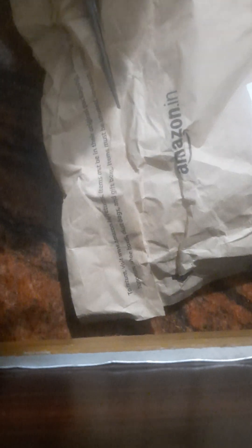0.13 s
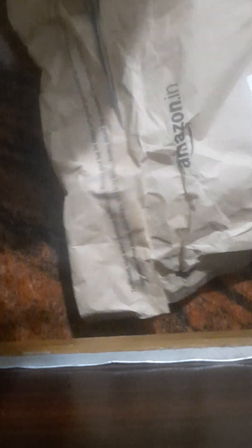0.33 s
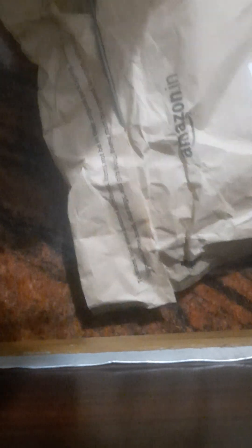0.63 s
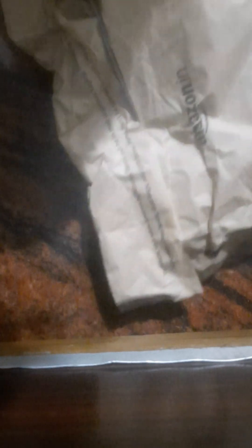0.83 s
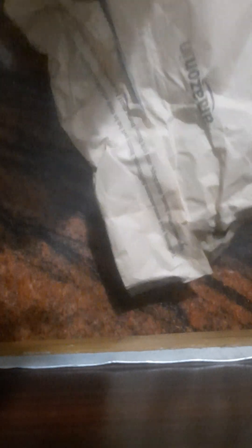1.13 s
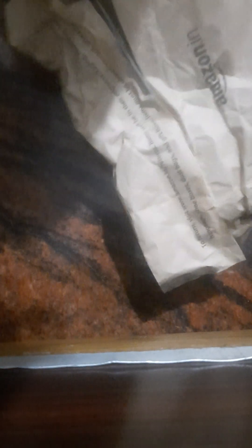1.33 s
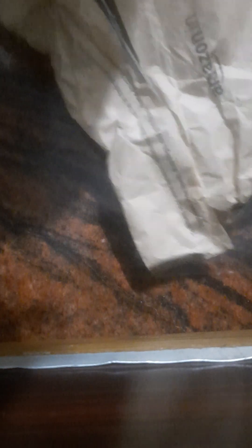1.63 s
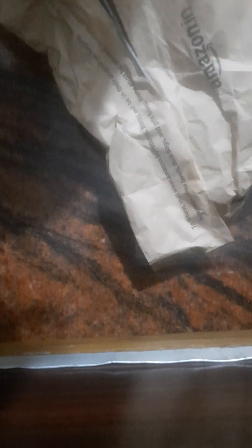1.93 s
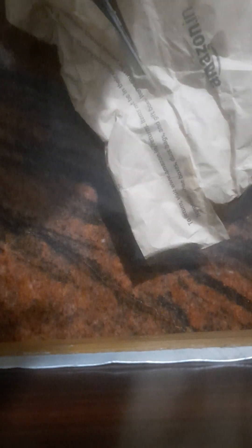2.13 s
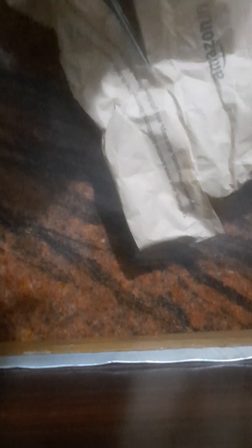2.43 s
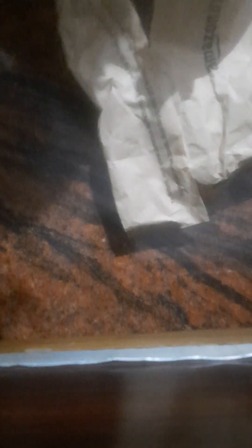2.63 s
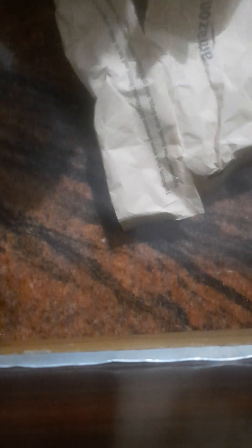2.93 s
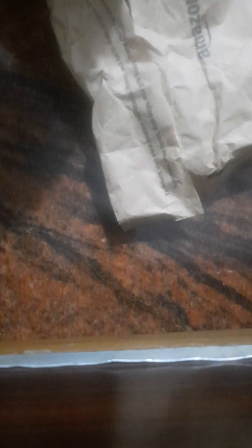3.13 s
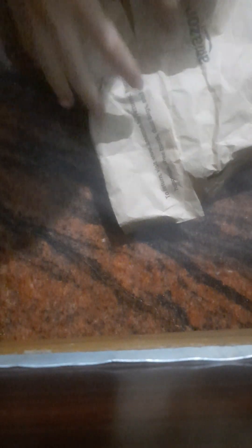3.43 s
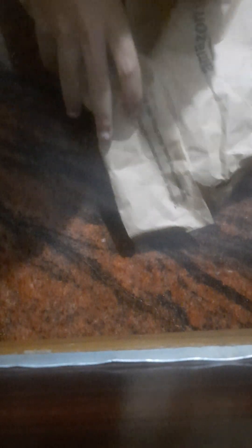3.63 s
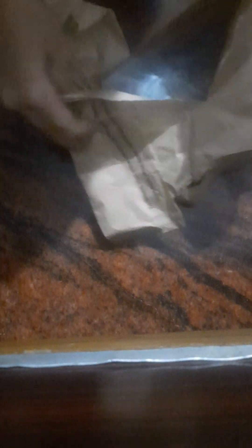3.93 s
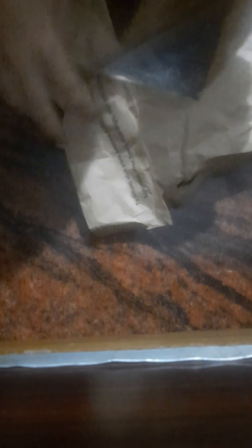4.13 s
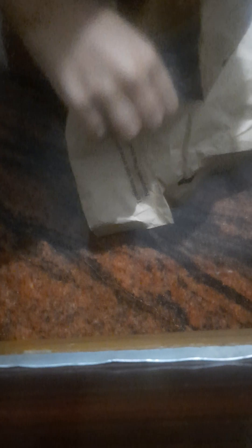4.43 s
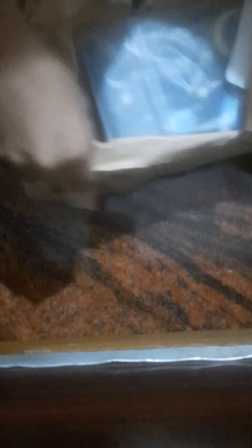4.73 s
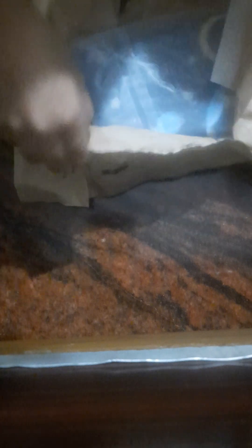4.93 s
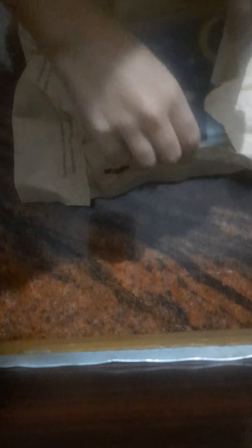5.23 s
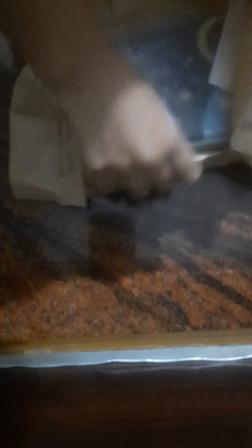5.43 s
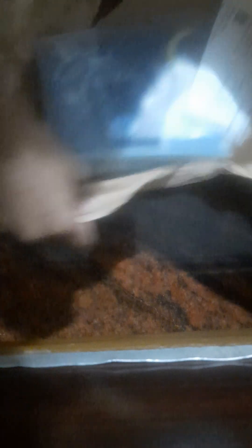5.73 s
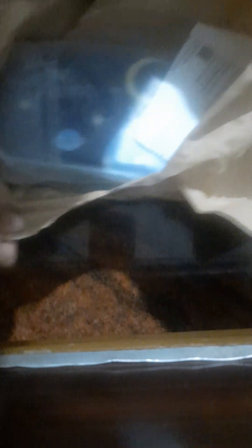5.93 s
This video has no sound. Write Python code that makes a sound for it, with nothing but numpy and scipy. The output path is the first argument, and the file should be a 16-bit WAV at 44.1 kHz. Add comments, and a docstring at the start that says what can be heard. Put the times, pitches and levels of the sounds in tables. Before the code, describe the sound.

Close up in a small, slightly echoing room, stiff paper crunches and crackles as scissors cut along a mailer bag. After a brief lull with a few fine ticks, hands tug the bag apart: irregular rustles, hissing rips and sharp crease snaps, with a soft hollow boom as it flexes open. A very faint hum lies underneath.

```python
"""Scissors crunch through a paper mailer bag on a stone counter; then hands pull the bag apart.
Each stroke takes up slack, grabs, holds and lets go: creases buckle and crinkle, fibres break and
hiss, and the hollow bag flexes and thuds. Single creases snap, and the last fibres part with thin ticks.
A small hard room echoes it all to a nearby phone, over a low hum and two faint far tones."""
import sys
import numpy as np
from scipy import signal
from scipy.fft import rfft, irfft
from scipy.io import wavfile
from scipy.ndimage import uniform_filter1d

SR = 44100
rng = np.random.default_rng(int(sys.argv[2]) if len(sys.argv) > 2 else 0)


def materialize(psi):
    """Save the field psi as 16-bit PCM at rate SR to the path in sys.argv[1].

    A 1-D psi becomes a single channel; in a 2-D psi each row is a channel.
    """
    bounded = np.clip(np.atleast_2d(psi).T, -1, 1)
    quanta = np.round(bounded * 32767).astype(np.int16)
    wavfile.write(sys.argv[1], SR, quanta)


N = 268128
TIME = np.arange(N) / SR

# strokes of scissors and hands: start t/s, hold t/s, level/dB, swell over the hold/dB,
# then, against the stroke: breaking fibres level/dB, flexing bag level/dB
PAPER_STROKES = [(-0.03, 0.096, -30.5, -4, -10, -5), (.162, 0.11, -28, 6, -7, -15.5),
                 (0.301, 0.074, -34, 8, -4.5, -13), (0.376, 0.064, -24.5, -2.5, -7.5, -7.5),
                 (0.5, 0.053, -43.5, 6, -11, -4), (.57, 0.091, -27.5, 0.5, -5.5, -12),
                 (0.722, .045, -41.5, -0.5, -8, -2.5), (0.779, 0.074, -30, -4, -7, -8.5),
                 (.835, 0.06, -23.5, 1, -5.5, -13.5), (1.026, 0.11, -28.5, 5, -5.5, -11),
                 (1.237, .09, -35, 5.5, -4.5, -10.5), (1.338, .11, -25.5, 0, -4, -13),
                 (1.573, 0.028, -45.5, 0, -4.5, 4), (1.606, 0.18, -34.5, -9.5, -8.5, -6.5),
                 (1.803, 0.085, -49.5, 0, -14, -2), (1.967, 0.16, -31.5, -4.5, -8.5, -7),
                 (2.155, 0.097, -37.5, -0.5, -6, -9), (2.339, .04, -46.5, 3, -8, 9.5),
                 (2.385, 0.23, -28.5, 1, -10, -5.5), (2.626, 0.058, -37, -2, 2, -14),
                 (2.854, 0.16, -52.5, -6.5, -4.5, -6.5), (2.976, 0.2, -44, -1.5, -2.5, -11.5),
                 (3.36, 0.019, -44.5, 9.5, -3, -5), (3.39, 0.042, -29.5, 7, -5.5, -16.5),
                 (3.48, 0.14, -32.5, -1, -9.5, -13), (3.62, 0.23, -20.5, 0.5, -1.5, -13.5),
                 (3.801, 0.022, -28, 0, -11, 0), (4.016, 0.081, -48, -2.5, -4, -21),
                 (4.104, 0.044, -43.5, 4, -4.5, -7), (4.428, .045, -48, 3.5, 2, -15),
                 (4.477, 0.074, -28, 2, 2, -8), (4.562, 0.18, -23, -1.5, -1, -6.5),
                 (4.846, 0.042, -33.5, -1, -7, -9.5), (4.918, 0.066, -45, 2.5, -3, -15),
                 (5.106, 0.2, -51.5, -2.5, -1.5, -2.5), (5.142, 0.023, -44, -1.5, -25, -6),
                 (5.337, 0.14, -35.5, 1, -9.5, -6), (5.49, 0.043, -20, 1.5, -0.5, -9),
                 (5.53, 0.069, -30, 4, -0.5, -1), (5.636, .05, -34, -4, -3.5, -13),
                 (5.676, 0.072, -17.5, -3, -1.5, -5), (5.886, 0.14, -40, -4.5, -7, -5.5)]
# single creases snapping: t/s, relative crease level/dB, relative fibre crack level/dB, facet f/Hz
CREASE_SNAPS = [(0.064, -15.5, -36, 1200), (0.164, -32, -38, 2200), (0.219, -25, -34, 1530),
                (0.282, -13.5, -25.5, 1510), (0.327, -22.5, -31, 980), (0.393, -14, -26, 970),
                (0.419, -17, -31, 1200), (0.444, -17, -28, 1400), (0.612, -13, -39, 860),
                (0.771, -10, -20, 2970), (0.817, -15.5, -22.5, 1580), (1.156, -20, -31, 1590),
                (1.231, -18.5, -35.5, 930), (1.277, -22, -46, 1400), (1.324, -13, -32, 1300),
                (1.37, -10.5, -23.5, 1400), (1.393, -18, -28, 1810), (1.42, -20.5, -23, 1420),
                (1.608, -21, -35.5, 2070), (1.836, -34, -35.5, 2980), (1.962, -21.5, -37, 1350),
                (2.023, -26, -31, 1630), (2.121, -23.5, -28.5, 1500), (2.14, -21, -28, 1700),
                (2.221, -17.5, -43, 2000), (2.392, -15.5, -26, 2600), (2.424, -18, -40, 940),
                (2.442, -16.5, -23, 2020), (2.458, -22, -25, 2800), (2.472, -10.5, -31, 2600),
                (2.505, -17, -22, 2010), (2.523, -22, -18, 1800), (2.56, -16, -28.5, 1570),
                (2.607, -17, -18.5, 1690), (3.136, -27.5, -50, 2810), (3.391, -25.5, -31, 1990),
                (3.404, -20, -21.5, 1300), (3.436, -21.5, -22.5, 2300), (3.491, -23.5, -35.5, 2300),
                (3.535, -20, -33.5, 1790), (3.576, -13, -18.5, 2740), (3.621, -13, -24, 2510),
                (3.641, -14, -38, 2600), (3.661, -13, -19, 2600), (4.102, -31, -54, 1600),
                (4.149, -28.5, -34, 1690), (4.443, -29.5, -49, 2000), (4.473, -15, -32, 2170),
                (4.983, -20.5, -37, 2820), (5.165, -31.5, -59, 1680), (5.448, -22.5, -25.5, 2000),
                (5.786, -19, -20.5, 2180), (5.92, -25, -48, 2130), (5.996, -19, -28.5, 2300),
                (6.047, -24.5, -39.5, 2780)]
# thin ticks as the last fibres part: t/s, relative level/dB
FIBRE_TICKS = [(1.036, -20.5), (2.866, -50), (2.972, -23.5), (2.988, -14.5), (3.009, -24), (3.024, -21.5),
               (3.078, -16.5), (3.109, -22.5), (3.416, -20)]
# how far the mouth of the bag is open: t/s, share from 0 to 1
BAG_OPENING = [(2.7, 0.2), (3.6, 0.79)]
# A "colour" says how strong each frequency is compared with the others.
# colours of buckling creases, breaking fibres and ticks: f/Hz, level/dB
CREASE_COLOUR = [(100, -16), (300, -13), (450, 1.5), (1000, -3), (2000, -2.5), (3500, -3.5), (5000, -9),
                 (9000, -56)]
FIBRE_COLOUR = [(500, -37), (2000, -12), (4200, 0), (7000, 0.5), (8800, -3.5), (12000, -2.5), (16000, -2)]
TICK_COLOUR = [(800, -29), (2500, -11), (4000, -4), (9000, -2), (12000, 0), (16000, 8)]
# colours of the closed bag on the counter and of the air in the open bag: f/Hz, level/dB
THUD_COLOUR = [(25, -53), (45, -8.5), (75, -9.5), (120, 5), (160, -3), (250, -5.5), (380, -2), (800, -35.5)]
HOLLOW_COLOUR = [(30, -38.5), (100, -15.5), (170, -5), (215, -6.5), (290, 0.5), (360, -9.5), (800, -43)]
# resonances of the bag and the space around it, and the stiff paper's brief ring: f/Hz, width/Hz, lift/dB
BAG_RESONANCES = [(56, 30, 12), (101, 17, 5.5), (212, 75, 7.5), (250.7, 42, 6.5), (410.7, 43.6, 12.5),
                  (585, 33, 9.5), (744, 45, 5.5), (1092, 107, 11), (1453, 43, 10.5), (7090, 530, 5)]
PAPER_RING = [(2290, 110, 7.5)]
# colour of the room's quiet air: f/Hz, level/dB
AIR_COLOUR = [(18, -36), (30, -13), (211, -14.5), (355, -12.5), (978, -19), (1730, -17), (3980, -52),
              (6700, -29.5), (15000, -52.5)]
# steady hum: f/Hz, level/dB
HUM_TONES = [(98, -74.5), (209.9, -64.5)]
# faint far tones: start t/s, length t/s, start f/Hz, end f/Hz, peak level/dB
DISTANT_TONES = [(1.68, .3, 470, 460, -56), (2.7, .3, 399, 388, -56)]
# colour of the right microphone, which faces away from the paper: f/Hz, level/dB against the left
FAR_MIC_COLOUR = [(60, -3.5), (170, -3.5), (290, 8), (380, -23.5), (520, -5.5), (740, 3.5), (1020, -5.5),
                  (1300, 0.5), (2300, 1.5), (3200, -1.5), (6800, -7), (8500, -11.5), (14000, -16)]

GRAB_S, BAG_GRAB_S = 0.0059, 0.026
# after a stroke the fibres stop first and the whole bag settles last
CREASE_RELEASE_DB_PER_S, FIBRE_RELEASE_DB_PER_S, BAG_RELEASE_DB_PER_S = 262.5, 304, 165.5
# taking up slack before each grab: length, and levels against the stroke
SLACK_S, CREASE_SLACK_DB, FIBRE_SLACK_DB, BAG_SLACK_DB = 0.065, -17, -20, -10
CUTTING_ENDS_S, HAND_SLACK_DB = 2.75, -5  # after the cutting, hands grab with less warning
# slip rates in a usual stroke; EFFORT_POWER sets how they grow with its strength
USUAL_DB, BUCKLES_PER_S, BREAKS_PER_S, EFFORT_POWER = -29.5, 1600, 3300, .45
# snaps come from the bag's near edge: gain into the room, and straight to each microphone
SNAP_ROOM_DB, SNAP_NEAR_DB, SNAP_FAR_DB = -1.5, -9.5, -22.5
FAR_MIC_LAG_S, TOP_HZ = 0.00048, 15900


def undb(db):
    """Turn decibels into a number to multiply by."""
    return 10 ** (np.asarray(db) / 20)


def unit(h):
    """Scale a signal so that its energy is 1."""
    return h / np.sqrt(np.sum(h ** 2))


def through(x, h):
    """Pass a sound through a filter, given as its response h to one click."""
    return signal.oaconvolve(x, h)[:len(x)]


def response(colour, peaks=(), size=4096):
    """How a filter with this colour and these resonant peaks answers one click."""
    f = np.maximum(np.fft.rfftfreq(size, 1 / SR), 1)
    hz, db = np.transpose(colour)
    db = np.interp(np.log(f), np.log(hz), db)
    for centre, width, lift in peaks:
        db = db + lift / (1 + (2 * (f - centre) / width) ** 2)
    cepstrum = irfft(np.log(undb(db)))
    cepstrum[1:size // 2] *= 2  # folding this in half puts all the ringing after the click
    cepstrum[size // 2 + 1:] = 0
    return irfft(np.exp(rfft(cepstrum)))


def steady(x, span_s):
    """Even out the loudness over a short span, keeping the grain."""
    power = uniform_filter1d(x ** 2, int(span_s * SR))
    power = uniform_filter1d(power, int(span_s * SR / 2))
    return x / np.sqrt(np.maximum(power, 0) + 1e-12)


def pressure(grab_s, release_db_per_s, slack_db, fibre=False, flex=False):
    """Strength of the strokes: each takes up slack, grabs, swells or eases while held, then lets go."""
    power = np.full(N, 1e-12)
    for start, hold, level_db, swell_db, fibre_db, flex_db in PAPER_STROKES:
        span = slice(int(max(start - SLACK_S, 0) * SR), int((start + 1) * SR))
        t = TIME[span] - start
        db = level_db + fibre * fibre_db + flex * flex_db
        db = db + swell_db * (np.clip(t / hold, 0, 1) - .5)
        db = db - release_db_per_s * np.maximum(t - hold, 0)
        slack_gain = undb(slack_db + HAND_SLACK_DB * (start > CUTTING_ENDS_S))
        slack = slack_gain * np.sqrt(np.clip(1 + t / SLACK_S, 0, 1))
        grab = np.clip(t / grab_s, 0, 1)
        power[span] += (np.maximum(slack, grab) * undb(db)) ** 2
    return np.sqrt(power)


def slips(per_s, spread_db):
    """The paper gives in tiny random jumps, either way: many small, a few large."""
    happens = rng.random(N) < per_s / SR
    size = undb(spread_db * np.minimum(rng.exponential(size=N), 5))
    return happens * size * rng.choice([-1, 1], N)


def facet(x, hz, q):
    """A facet, a patch of paper between creases, rings very briefly; a higher q rings longer."""
    hz = min(hz, SR / 3)
    return signal.lfilter(*signal.iirpeak(hz, max(q, 4 * hz / SR), fs=SR), x)


def swarm(pulses, low_hz, high_hz, q, count=9):
    """Every slip rings one of several facets, picked at random."""
    which = rng.integers(0, count, N)
    pitches = np.geomspace(low_hz, high_hz, count)
    return sum(facet(pulses * (which == k) + 1e-18, hz, q) for k, hz in enumerate(pitches))


def catching(depth_db, limit=1.5, size=180):
    """Paper catches and gives every few milliseconds, so slips come in bunches of limited strength."""
    strengths = np.minimum(rng.standard_normal(N // size + 1), limit)
    held = np.repeat(strengths, size)[:N]
    return steady(undb(depth_db * uniform_filter1d(held, size // 2)), span_s=0.11)


def strokes(crinkling):
    """Creases buckle, fibres break and the whole bag flexes; harder strokes slip more often."""
    breaking = pressure(GRAB_S, FIBRE_RELEASE_DB_PER_S, FIBRE_SLACK_DB, fibre=True)
    flexing = pressure(BAG_GRAB_S, BAG_RELEASE_DB_PER_S, BAG_SLACK_DB, flex=True)
    effort = (crinkling / undb(USUAL_DB)) ** EFFORT_POWER
    buckles = slips(BUCKLES_PER_S * effort, spread_db=3.5)
    breaks = slips(BREAKS_PER_S * effort, spread_db=4.0) + 0.95 * buckles  # buckling breaks fibres too
    rub = rng.standard_normal(N)  # sheet slides on sheet
    creases = steady(swarm(buckles, low_hz=377, high_hz=5450, q=1.27), span_s=0.019) + undb(-31) * rub
    coarse = steady(swarm(breaks, low_hz=2930, high_hz=8100, q=1.1), span_s=0.04) + undb(-7.5) * rub
    fine = steady(swarm(breaks, low_hz=8800, high_hz=15170, q=2.3), span_s=0.042)
    brightness = (breaking / crinkling) ** 0.54  # ripping is brighter than cutting
    fibres = undb(-3.5) * coarse + undb(-1.0) * brightness * fine
    bunches = catching(depth_db=4.8)
    creases = undb(-6.0) * creases * bunches ** 0.12 * crinkling
    fibres = fibres * bunches * breaking
    flex = undb(0.5) * steady(buckles, span_s=0.062) * flexing
    return creases, fibres, flex


def coloured(raw, colour):
    """Give a raw sound a colour, plus the ringing of the bag and its stiff paper."""
    peaks = list(BAG_RESONANCES) + list(PAPER_RING)
    return through(raw, unit(response(colour, peaks, size=8192)))


def bag_body(flex):
    """The closed bag thuds on the counter; as it opens, the air inside it booms."""
    opening = np.interp(TIME, *np.transpose(BAG_OPENING))
    thud = coloured(flex * (1 - opening), THUD_COLOUR)
    boom = coloured(flex * opening, HOLLOW_COLOUR)
    return undb(-0.5) * thud + undb(-2.0) * boom


def air_and_hum(air_db=-72):
    """Quiet air, partly shared by both microphones, and a steady low hum."""
    air = np.array([through(rng.standard_normal(N), unit(response(AIR_COLOUR))) for _ in range(3)])
    hum = sum(undb(db) * np.sqrt(2) * np.sin(2 * np.pi * hz * TIME) for hz, db in HUM_TONES)
    return undb(air_db) * (air[:2] + air[2]) / np.sqrt(2) + hum


def burst(fade_s, size):
    """A run of tiny slips that builds for a moment and dies away."""
    t = np.arange(size) / SR
    return unit(rng.standard_normal(size) * np.sqrt(t) * np.exp(-t / fade_s))


def snaps(rows, crack_pitch_ratio=3.2, size=1024):
    """A crease gives in one jump and a run of slips: it pops, cracks fibres and jolts the bag."""
    pops, cracks, jolts = np.zeros((3, N + size))
    for start, crease_db, crack_db, hz in rows:
        jump = (np.arange(size) == 0) * rng.choice([-1, 1])
        pop = unit(facet(jump + 0.95 * burst(0.0015, size), hz, q=1.0))
        tear = .35 * jump + burst(.001, size)
        # small facets crack brighter
        crack = unit(facet(tear, crack_pitch_ratio * hz, q=0.31) + 0.17 * tear)
        at = int(max(start, 0) * SR)
        pops[at:at + size] += undb(crease_db + 13) * pop
        cracks[at:at + size] += undb(crack_db + 24.5) * crack
        jolts[at:at + size] += undb(crease_db - 5) * jump
    return pops[:N], cracks[:N], jolts[:N]


def small_snaps(crinkling, per_s=12, spread_db=0.5, facet_hz=(1200, 2600), count=256):
    """Small creases give at random, louder in harder strokes; returns rows like CREASE_SNAPS."""
    times = np.cumsum(rng.exponential(size=count)) / per_s
    force = np.interp(times, TIME, crinkling)
    force = np.minimum(force, undb(USUAL_DB))  # a small crease holds only so much
    db = 20 * np.log10(force) + spread_db * rng.standard_normal(count)
    crease_db, crack_db = db - 1, db - 4
    hz = rng.uniform(*facet_hz, count)
    return list(np.column_stack([times, crease_db, crack_db, hz])[times < TIME[-1]])


def ticks(size=512):
    """A few fibres part within a millisecond or two."""
    out = np.zeros(N + size)
    for start, db in FIBRE_TICKS:
        at = int(start * SR)
        out[at:at + size] += undb(db + 26.5) * burst(.0006, size)
    return out[:N]


def far_tones():
    """Two faint tones from afar swell and fade, each sinking a little in pitch."""
    out = np.zeros(N)
    for start, length, from_hz, to_hz, db in DISTANT_TONES:
        progress = np.clip((TIME - start) / length, 0, 1)
        phase = 2 * np.pi * np.cumsum(from_hz + (to_hz - from_hz) * progress) / SR
        out += undb(db) * np.sin(np.pi * progress) * np.sin(phase)
    return out


def places(x, count=8, size=160):
    """The sound leaps from place to place on the bag every few milliseconds; one share per place."""
    where = np.repeat(rng.integers(0, count, N // size + 1), size)[:N]
    return [x * uniform_filter1d((where == k) * 1., size // 2) for k in range(count)]


def room(direct_db, early_db=-3.5, early_s=0.004, tail_db=-3.5, tail_s=0.29, treble_s=0.22, size=16384):
    """Direct sound, quick dull echoes off counter and bag, then a short tail whose treble dies first."""
    t = np.arange(size) / SR
    noise = signal.sosfilt(signal.butter(2, 200, "high", fs=SR, output="sos"), rng.standard_normal(size))
    low = signal.sosfilt(signal.butter(1, 4000, fs=SR, output="sos"), noise)
    early = (low + 0.75 * noise) * np.exp(-t / early_s) * (t > .0003)
    fade = -np.log(1000) * t  # tail_s and treble_s are the times to fall by 60 dB
    tail = (low * np.exp(fade / tail_s) + (noise - low) * np.exp(fade / treble_s)) * (t > .004)
    return unit(undb(direct_db) * (t == 0) + undb(early_db) * unit(early) + undb(tail_db) * unit(tail))


def scene():
    """Strokes and snaps sound through the paper, then through the room to two microphones."""
    crinkling = pressure(GRAB_S, CREASE_RELEASE_DB_PER_S, CREASE_SLACK_DB)
    creases, fibres, flex = strokes(crinkling)
    pops, cracks, jolts = snaps(CREASE_SNAPS + small_snaps(crinkling))
    snapping = coloured(pops, CREASE_COLOUR) + coloured(cracks, FIBRE_COLOUR)
    snapping += coloured(ticks(), TICK_COLOUR)
    paper = coloured(creases, CREASE_COLOUR) + coloured(fibres, FIBRE_COLOUR)
    paper += undb(SNAP_ROOM_DB) * snapping
    body = bag_body(flex + jolts)  # long waves reach both microphones alike
    left = body + undb(SNAP_NEAR_DB) * snapping
    right = body + undb(SNAP_FAR_DB) * snapping
    for share in places(paper):  # every place has its own echoes
        left += through(share, room(direct_db=0))
        right += through(share, room(direct_db=-5.5))  # the far microphone gets less direct sound
    right = through(right, response(FAR_MIC_COLOUR))
    right = np.pad(right, (int(FAR_MIC_LAG_S * SR), 0))[:N]
    return np.array([left, right]) + air_and_hum() + far_tones()


def record(dry):
    """The phone drops the deep bass, clips at full scale and cuts the highest treble."""
    dry = signal.sosfilt(signal.butter(3, 42, "high", fs=SR, output="sos"), dry)
    return signal.sosfilt(signal.ellip(10, .2, 70, TOP_HZ, fs=SR, output="sos"), np.clip(dry, -1, 1))


dry = scene()
out = record(dry)
materialize(out)
```